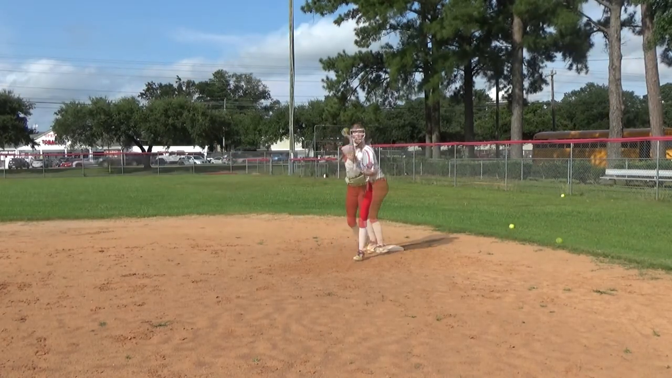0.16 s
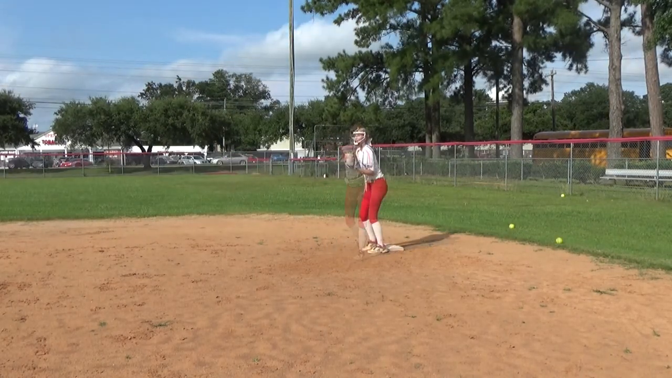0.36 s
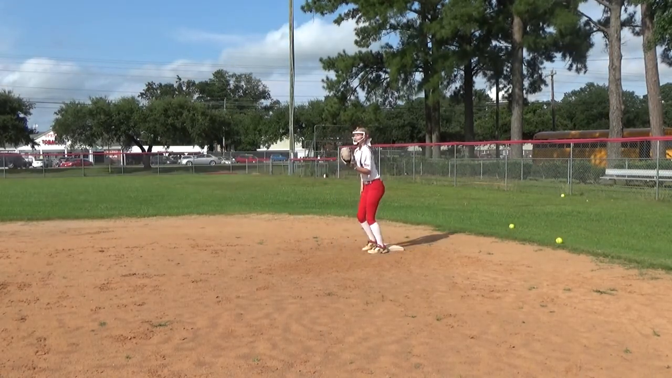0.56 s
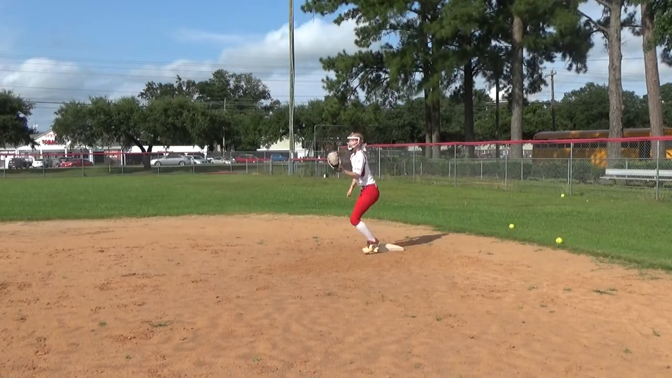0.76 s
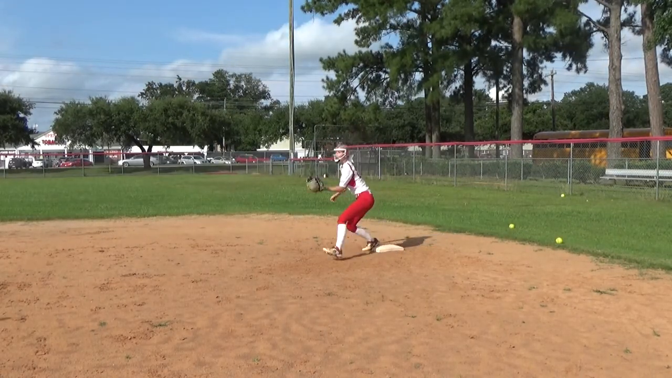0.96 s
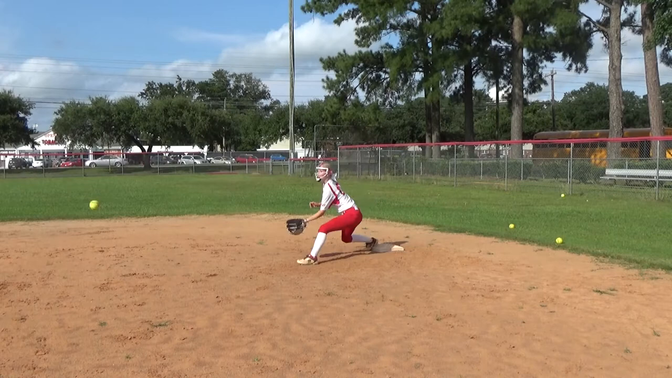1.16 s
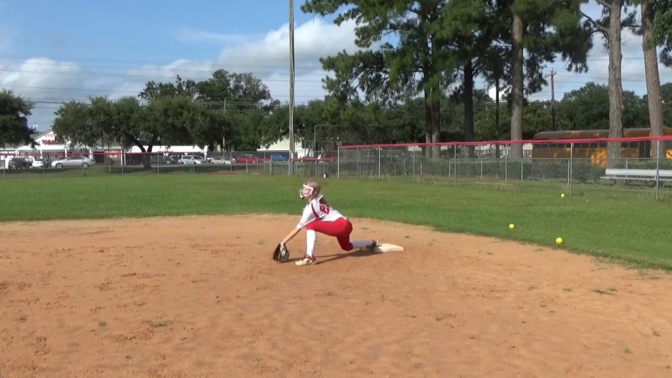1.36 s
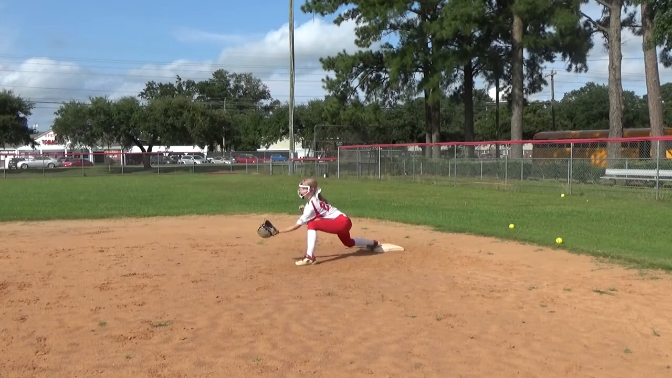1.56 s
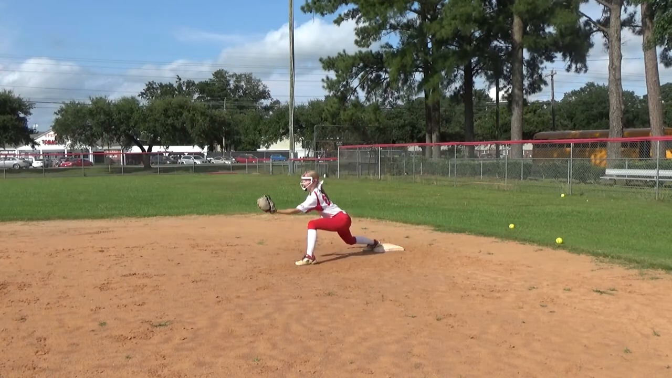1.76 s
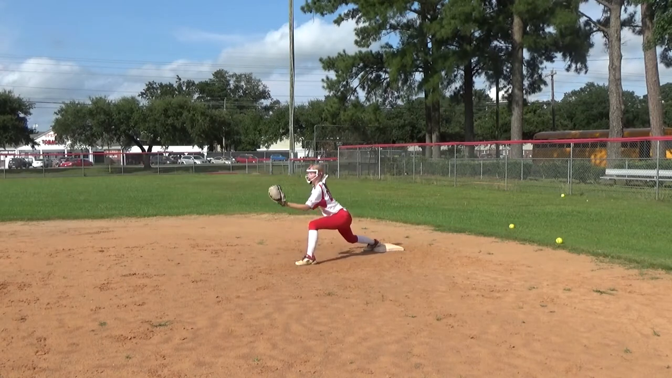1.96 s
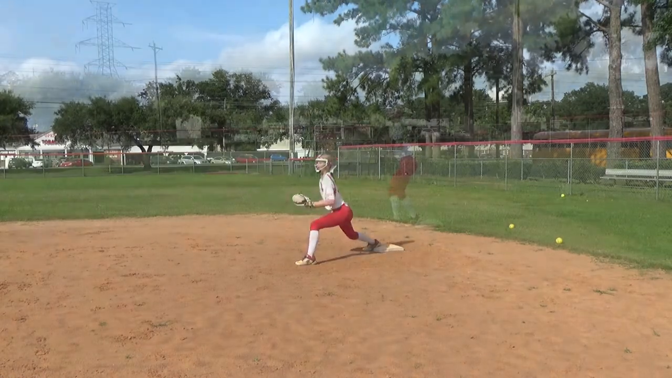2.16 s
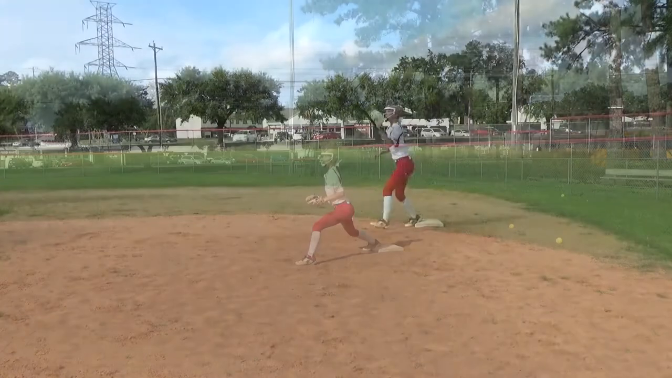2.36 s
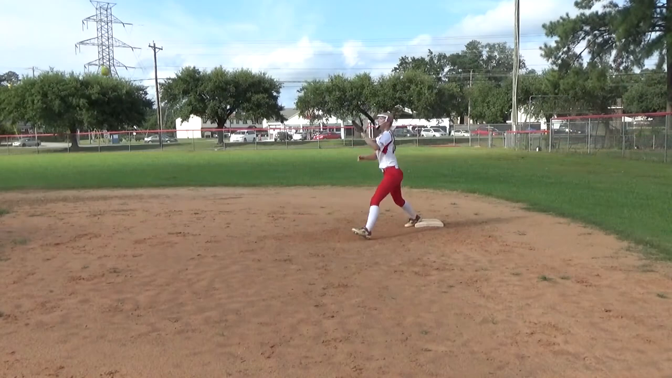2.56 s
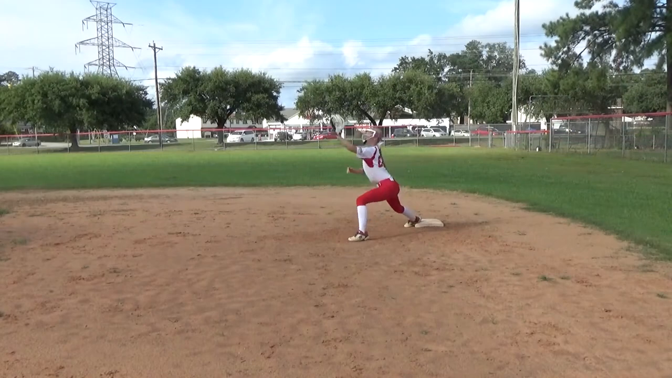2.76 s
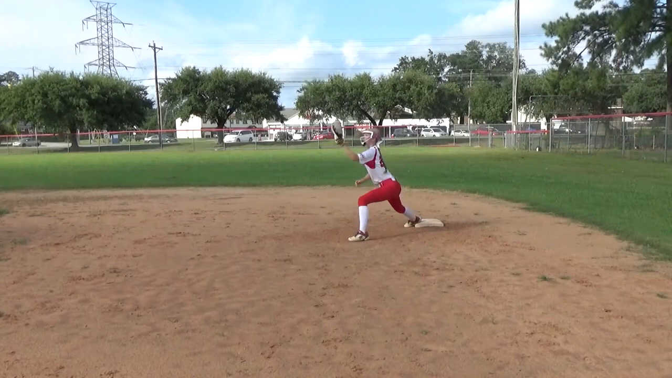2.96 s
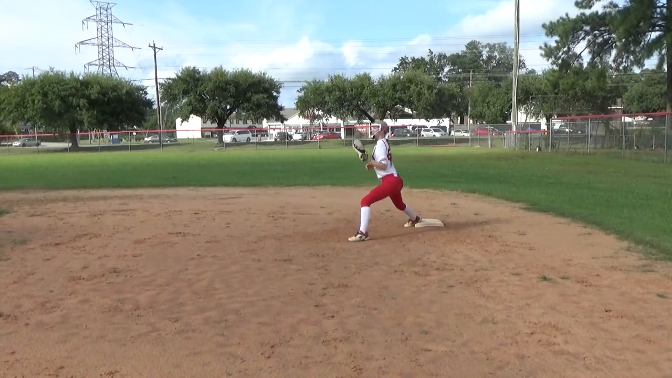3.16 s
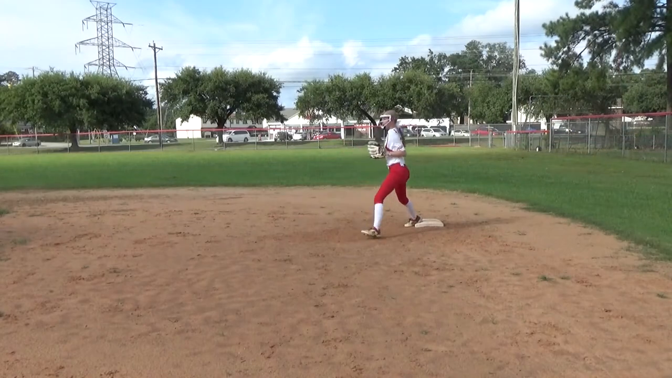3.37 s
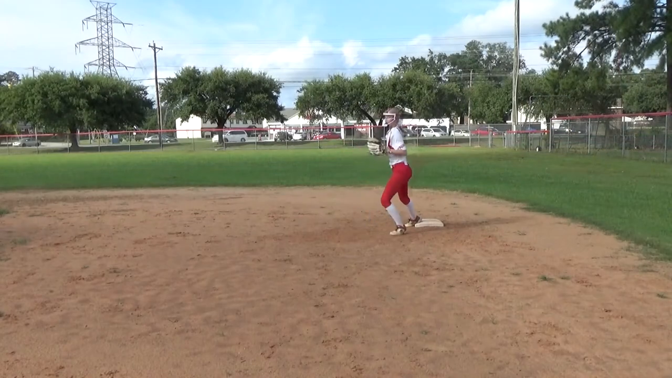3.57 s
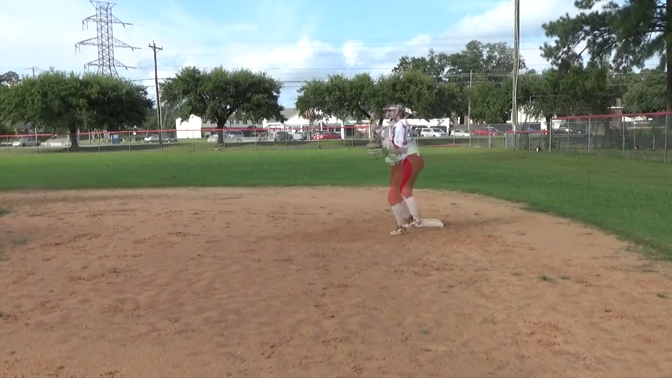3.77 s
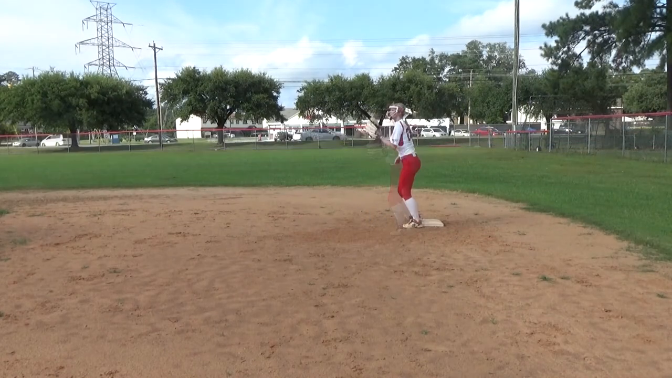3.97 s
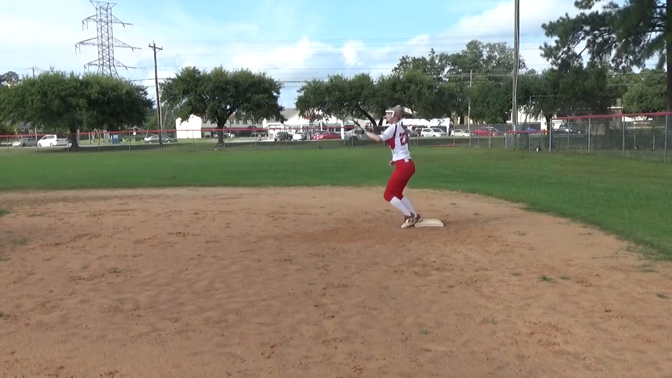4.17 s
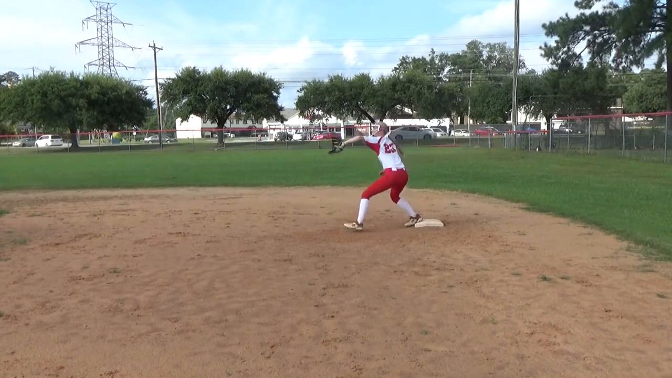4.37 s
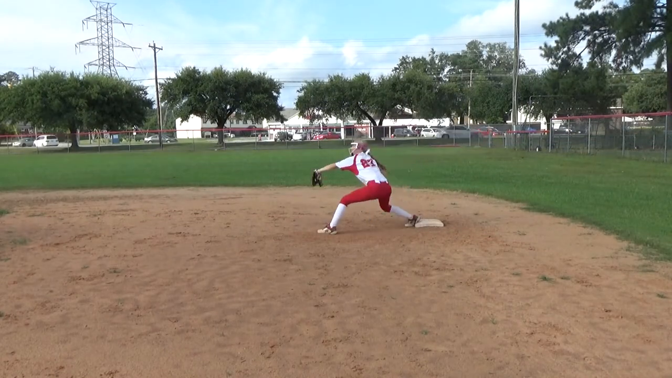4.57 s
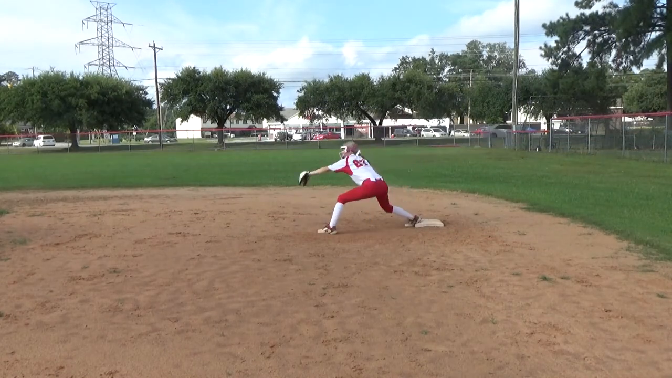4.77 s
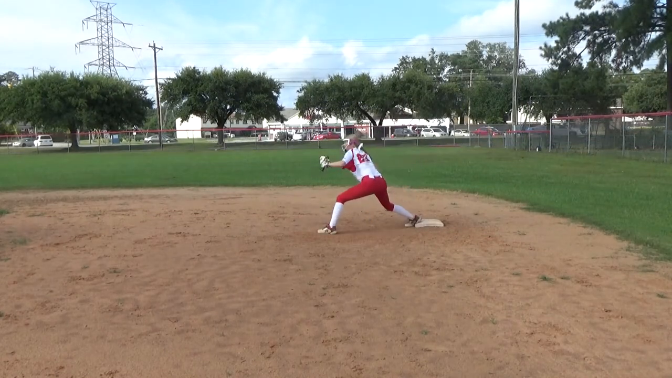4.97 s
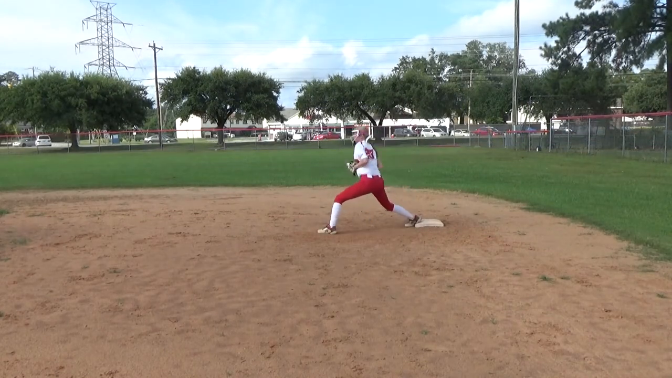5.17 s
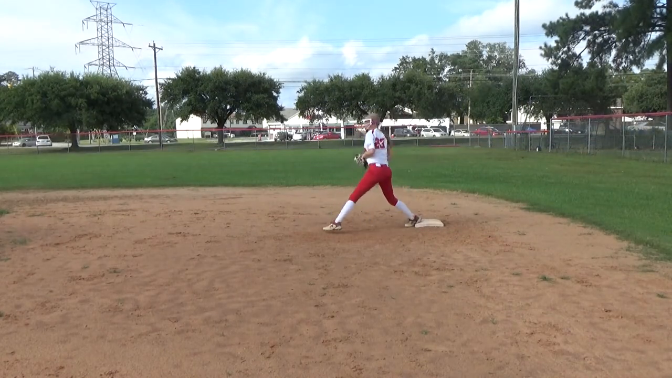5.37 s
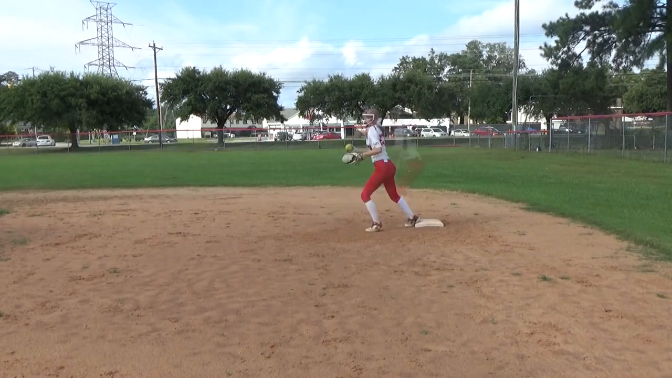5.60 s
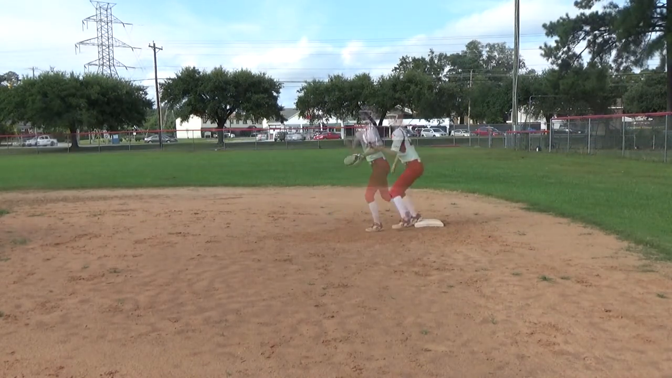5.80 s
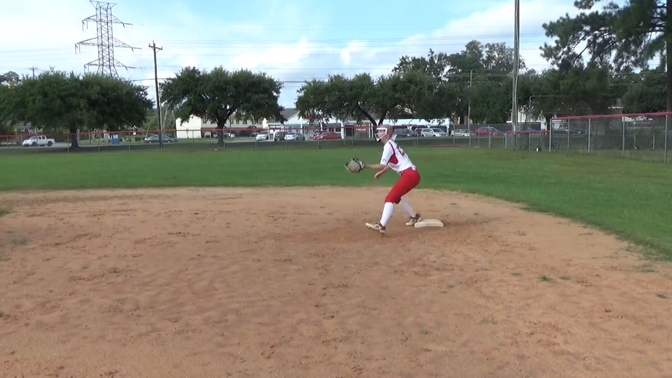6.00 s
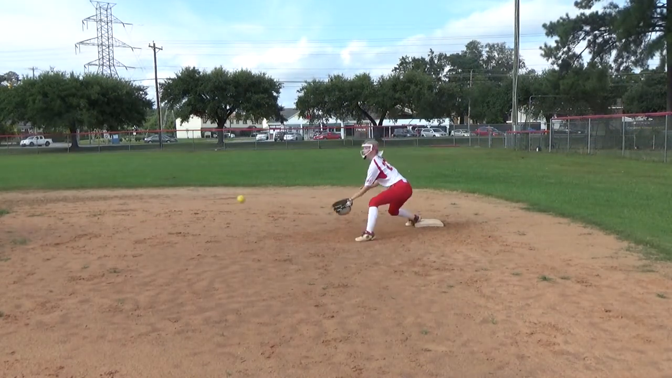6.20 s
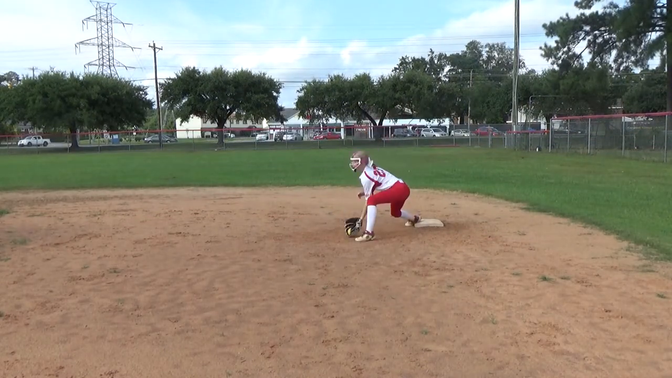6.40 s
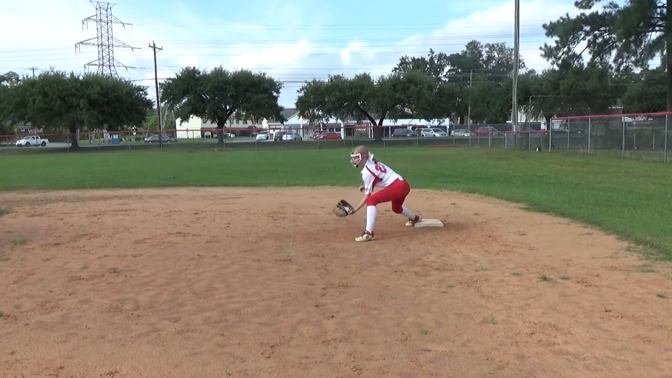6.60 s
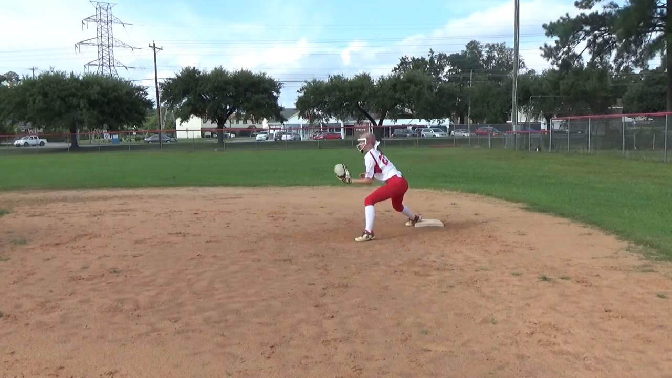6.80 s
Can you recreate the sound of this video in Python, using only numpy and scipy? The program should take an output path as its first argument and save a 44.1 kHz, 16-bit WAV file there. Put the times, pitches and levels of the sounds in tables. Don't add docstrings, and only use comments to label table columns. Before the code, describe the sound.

A fielder catches four throws on a dirt infield. Each catch is a hard, dry leather pop with a very short pocket ring, surrounded by gritty steps, cloth rustle and tiny knocks. The last three slap back faintly from the right. Gusts rumble and flutter on the camera's microphone, strongest early, above distant traffic and leaves; thin insects grow fuller near the end, with a barely audible mechanical tick.

```python
import sys
import numpy as np
from scipy import signal
from scipy.fft import rfft, irfft, next_fast_len
from scipy.io import wavfile
from scipy.ndimage import uniform_filter1d

SR = 44100
rng = np.random.default_rng(int(sys.argv[2]) if len(sys.argv) > 2 else 0)


def volts(x):
    e = np.asarray(x, float) / 20
    return 10 ** e


def output_pcm(signal):
    pcm = np.clip(np.atleast_2d(signal).T, -1, 1) * 32767
    wavfile.write(sys.argv[1], SR, np.round(pcm).astype(np.int16))


N = 301718
SIDES = np.array([[1], [-1]])

# start in seconds, end in seconds, level left in dB.
DROPOUTS = [
    (.2912, .2932, -12),
    (2.3602, 2.3722, -30),
    (3.8622, 3.8862, -95),
]
# start in seconds, slap in dB, pocket ring in dB, pocket ring in Hz, ring T60 in ms.
CATCH_BLOWS = [(1.4461, -8, -15, 1600, 45), (1.4481, -38, -7.5, 5860, 10), (1.448, -10, -10, 1017, 26),
               (1.4524, -18, -9, 797, 24), (2.8379, -8.5, -5.5, 6630, 9), (2.8395, -23, -4, 760, 8.9),
               (2.8433, -9.5, -9, 1140, 11), (2.8469, -9.5, -6, 813, 29), (2.8594, -15.5, -17, 910, 28),
               (4.622, -37, -18, 1320, 23), (4.6379, -14.5, 1, 1170, 7.5), (4.643, -34, -20, 1090, 27),
               (4.6614, -30, -17, 970, 15), (6.4097, -9.5, -6.5, 740, 8.3),
               (6.4107, -15.5, -10.5, 1650, 7.3), (6.4146, -28, -10, 705, 5.8), (6.434, -40, -35, 990, 23)]
# catch start in seconds, delay in ms, level in dB.
FENCE_ECHOES = [
    (2.837, 58, -14),
    (4.636, 54, -6),
    (6.407, 56.5, -11.5),
]


def evened(x):
    return x / np.sqrt(np.mean(x ** 2) + 1e-20)


def read(points, hz):
    f, value = np.transpose(points)
    return np.interp(np.log(hz + 1), np.log(f + 1), value)


def coloured(x, points, same=None):
    size = next_fast_len(x.shape[-1])
    hz, z = np.fft.rfftfreq(size, 1 / SR), rfft(x, size)
    if same:
        c = np.clip(read(same, hz), 0, 1)
        z = np.array([z[0], c * z[0] + np.sqrt(1 - c ** 2) * z[1]])
    return evened(irfft(z * volts(read(points, hz)), size)[..., :x.shape[-1]])


def lumps(per_s, channels=1):
    coarse = rng.standard_normal((channels, N // 32 + 2))
    hz = np.fft.rfftfreq(coarse.shape[1], 32 / SR)
    smooth = irfft(rfft(coarse) * np.exp(-(hz / per_s) ** 2), coarse.shape[1])
    return evened(np.repeat(smooth, 32, axis=1)[:, :N])


def band(x, hz, width):
    b, a = signal.iirpeak(hz, hz / width, SR)
    return signal.lfilter(b, a, signal.lfilter(b, a, x))


def stroke(start, length, rise, fall):
    t = np.arange(round(length * SR)) / SR
    at = round(start * SR) + np.arange(len(t))
    gain = np.clip(np.minimum(t / rise, (length - t) / fall), 0, 1)
    return at[at < N], gain[at < N]


def field():
    # time in seconds, level in dB.
    scene_db = [(0.0, -47.5), (1.41, -43.5), (2.5, -49), (2.8, -47.5), (3.14, -49.5), (4.86, -48.5),
                (5.01, -49.5), (6.1, -52.5), (6.29, -51.5), (6.42, -49), (6.65, -48.5), (6.84, -51)]
    # frequency in Hz, density in dB per Hz.
    wash_spectrum = [(25, -26), (60, -5.5), (120, 1.5), (220, -2), (420, -3.5), (800, 3.5), (1500, 1.5),
                     (2500, -3.5), (4000, -9), (6300, -12.5), (8500, -17), (10300, -17.5), (13000, -26.5),
                     (16000, -30.5)]
    # frequency in Hz, left-right likeness from 0 to 1.
    wash_likeness = [(60, 0.91), (150, 0.95), (380, 1), (950, 0.88), (2380, 0.64), (5980, 0.66),
                     (11000, 0.89)]
    return_db, return_s = 3, 0.074
    wash = coloured(rng.standard_normal((2, N)), wash_spectrum, wash_likeness)
    t = np.arange(N) / SR
    catch_starts = [CATCH_BLOWS[0][0]] + [row[0] for row in FENCE_ECHOES]
    tree_return = sum((t > s) * np.exp(-abs(t - s) / return_s) for s in catch_starts)
    level_db = np.interp(t, *np.transpose(scene_db)) + 5.0
    return volts(level_db + return_db * tree_return + 0.53 * lumps(7.5)) * wash


def wind():
    # start in seconds, length in seconds, rumble in dB, sharpness in dB.
    gusts = [(0.264, .21, -36.5, 7), (0.457, 0.19, -37, 2), (0.627, 0.18, -33.5, 6.5),
             (0.782, 0.24, -36, 7.5), (1.02, 0.15, -36, -5), (1.113, 0.25, -35.5, -2),
             (1.382, 0.1, -35, -3), (1.465, 0.37, -49.5, -9), (1.827, 0.17, -37, 0),
             (2.015, 0.072, -30.5, -2.5), (2.094, 0.39, -40, -17), (2.373, 0.08, -38, 4.5),
             (2.453, 0.21, -34.5, 8), (2.654, 0.19, -33, 2.5), (2.925, 0.23, -38.5, 2), (3.2, 0.27, -38, 1),
             (3.394, 0.22, -38.5, -2.5), (3.593, 0.31, -39, -3), (3.774, 0.2, -42.5, 7),
             (4.507, 0.204, -46.5, -15), (4.968, 0.13, -47.5, -25), (5.212, 0.35, -46.5, -16),
             (5.539, 0.19, -36, -9), (5.662, 0.17, -41, 0), (5.89, 0.17, -48, -1.5),
             (6.067, 0.11, -48.5, 4), (6.15, 0.17, -38.5, -1.5), (6.29, 0.15, -40.5, -7),
             (6.45, 0.12, -45, 2), (6.53, 0.12, -37.5, 3), (6.63, 0.21, -39.5, -3.5)]
    # frequency in Hz, density in dB per Hz.
    eddy_spectra = [
        [(25, -44), (60, -14.5), (120, -5), (200, 2), (290, -5), (600, -15.5), (2000, -88)],
        [(60, -31), (170, -17.5), (280, -1), (420, -3), (620, -12), (1500, -35), (4000, -64)],
        [(200, -30), (420, -11), (600, 5.5), (900, -2), (1500, -14), (3000, -39), (8000, -80)],
    ]
    # depth in dB, rate per second.
    eddy_lumps = [
        (2.4, 16),
        (3., 35),
        (3.8, 74),
    ]
    # frequency in Hz, left-right likeness from 0 to 1.
    port_likeness = [(60, .93), (150, .97), (300, .985), (500, .96), (800, .85), (1300, .6)]
    swell_s, die_s, breeze_db = 0.085, 0.14, -66.5
    roar_db, roar_share = -4, 1.16
    lag_ms, lag_swing_ms = .47, .08

    shared_db = 0.45 * lumps(39)
    force = np.full((3, N), volts(breeze_db))
    for start, length, db, sharp_db in gusts:
        at, gain = stroke(start - swell_s / 2, length + (swell_s + die_s) / 2, swell_s, die_s)
        size_db = np.array([[0], [sharp_db], [roar_db + roar_share * sharp_db]])
        force[:, at] += gain ** 2 * volts(db + size_db)
    force[:, :round(DROPOUTS[0][0] * SR)] = volts(breeze_db)
    calm_start = round(DROPOUTS[2][0] * SR)
    calm_end = round(DROPOUTS[2][1] * SR + 2 * die_s * SR)
    force[:, calm_start:calm_end] = volts(breeze_db)

    out = 0
    for spectrum, (lump_db, per_s), gain in zip(eddy_spectra, eddy_lumps, force):
        eddies = rng.standard_normal((2, N)) * volts(lump_db * lumps(per_s) + shared_db)
        out = out + gain * coloured(eddies, spectrum, port_likeness)
    drift = uniform_filter1d(lumps(8.0)[0], size=64)
    t = np.arange(N) / SR
    half_lag_s = (lag_ms + lag_swing_ms * drift) / 2000
    ports = np.array([np.interp(t + half_lag_s, t, out[0]), np.interp(t - half_lag_s, t, out[1])])
    return volts(SIDES * 0.36 * lumps(5.3)) * ports


def insects():
    # frequency in Hz, width in Hz, level in dB, clicks per second.
    choruses = [
        (7163, 430, -55.5, 2100),
        (9900, 950, -51.5, 11000),
        (5000, 1100, -60.5, 2900),
        (9100, 87, -65, 710),
        (4080, 340, -68, 850),
        (13500, 1800, -71, 6000),
    ]
    # start in seconds, end in seconds.
    song_times = [
        (0, 7),
        (5.829, 7),
        (5.829, 7),
        (.38, .8),
        (3.89, 5.829),
        (5.6, 7),
    ]
    t, out = np.arange(N) / SR, np.zeros((2, N))
    for (start, end), (hz, width_hz, db, per_s) in zip(song_times, choruses):
        clicks = rng.standard_normal((2, N)) * (rng.random((2, N)) < per_s / SR)
        clicks = clicks[0] + 0.34 * clicks[1] * SIDES
        singing = (t > start) & (t < end)
        out += volts(db + 1.4 * lumps(14)) * evened(band(clicks, hz, width_hz)) * singing
    return out


def camera():
    frame_rate_hz, first_tick_s = 29.97, .0235
    tick_s = first_tick_s + np.arange(int(N / SR * frame_rate_hz)) / frame_rate_hz
    at = (tick_s * SR).astype(int)
    ticks = np.zeros(N)
    ticks[at] = volts(2.2 * rng.standard_normal(len(at)))
    return volts(-61) * evened(band(ticks, 2740, 170))


def scuffs():
    # start in seconds, length in seconds, grit in dB, scrape over grit in dB, dust
    # over grit in dB.
    scuff_strokes = [(1.246, 0.046, -47, 17, 3.5), (1.294, 0.056, -45, 9, -2.5), (1.454, .02, -37, 0, 6),
                     (2.215, .045, -53, 3, 0), (2.702, 0.036, -37, 6, -2), (2.732, 0.04, -37.5, 2.5, -1),
                     (2.778, 0.037, -45, -12, -3), (2.883, 0.028, -44, 1, 3), (3.362, 0.048, -57, -5, 2),
                     (3.422, 0.062, -41, -2.5, -5.5), (3.473, 0.04, -38.5, 6, -1),
                     (3.645, 0.053, -45, 5, -7), (3.716, 0.022, -50.5, 12, 1), (3.912, 0.05, -60, -6, 11),
                     (4.581, 0.031, -46, 8, -5), (4.608, 0.075, -51, 10, 1), (4.677, 0.038, -46, 11, 1),
                     (6.223, 0.042, -46, 7.5, -1), (6.256, 0.043, -39, 6, -2.5), (6.316, 0.05, -40.5, 5, -5),
                     (6.447, 0.029, -45.5, 5, 3),
                     (1.472, 0.026, -45, 0, 5),
        (1.496, 0.075, -44.5, -14, 0.5),
        (4.715, 0.074, -46, 1, -3.5),
        (4.78, 0.103, -48, 2.5, -15),
        (5.69, 0.052, -52, 11, -2.5),
        (5.751, 0.045, -55, 12, -9),
        (6.472, .14, -50.5, 4, -2),
    ]
    # frequency in Hz, density in dB per Hz.
    grit_spectrum = [(900, -18), (2000, -10.5), (3300, -3.5), (6000, -4.5), (8000, -11.5), (11000, -50)]
    dust_spectrum = [(4500, -52), (7000, -5), (8500, 2), (10600, 5), (13500, -7), (16000, -19)]
    scrape_spectrum = [(350, -7.5), (800, 3), (1400, 5), (2200, 3.5), (3500, -18), (6000, -70)]
    bite_s, lift_s, drag_db_per_s = 0.0069, 0.013, -42

    grain_db = 5.0 * np.minimum(rng.exponential(1, N), 4) + 1.7 * lumps(190)
    grains = rng.standard_normal((2, N)) * volts(grain_db)
    grains = grains[0] + 0.088 * grains[1] * SIDES
    grit = coloured(grains, grit_spectrum)
    dust = coloured(grains, dust_spectrum)
    scrape = coloured(grains * volts(2.2 * lumps(70)), scrape_spectrum)
    force = np.zeros((3, N))
    for start, length, grit_db, scrape_db, dust_db in scuff_strokes:
        at, gain = stroke(start, length, bite_s, lift_s)
        layer_db = np.array([[1.5], [-0.5 + dust_db], [scrape_db]])
        force[:, at] += gain * volts(grit_db + drag_db_per_s * (at / SR - start) + layer_db)
    return force[0] * grit + force[1] * dust + force[2] * scrape


def fence(blows):
    catch_s = 0.03
    out = blows.copy()
    dull = signal.lfilter(*signal.butter(1, 3500, fs=SR), blows[0])
    for s, delay_ms, db in FENCE_ECHOES:
        at, gain = stroke(s, catch_s, .001, 0.0044)
        out[:, at + round(delay_ms * SR / 1000)] += volts(db) * gain * dull[at]
    return out


def glove():
    # frequency in Hz, density in dB per Hz.
    leather_spectrum = [(500, 11), (1200, 3.5), (1900, -1.5), (2650, 0.5), (3400, -3.5), (4400, -2),
                        (5200, -3.5), (5900, -4), (6800, -10.5), (8300, -9), (9700, -5.5), (11000, -10.5),
                        (13000, -19), (16000, -30)]
    # start in seconds, slap in dB, ring in dB, ring in Hz.
    small_knocks = [(1.2653, -28, -11, 1190), (1.2702, -32, -13, 1750), (1.2768, -38, -18, 1670),
                    (1.3851, -23, -21, 1870), (1.4697, -16, -25, 1400), (1.504, -43, -21.5, 880),
                    (1.661, -40, -20, 6000), (1.6412, -33, -14.5, 1440), (2.67, -36, -15, 450),
                    (2.7197, -27, -16, 860), (2.742, -24, -19, 1410), (3.47, -16, -12, 2700),
                    (3.663, -22, -28, 716), (3.7195, -32, -23, 866), (4.6847, -29, -32, 1740),
                    (4.711, -31, -21, 1150), (4.7523, -37, -19.5, 1130), (4.7948, -37, -18.5, 960),
                    (4.862, -32, -45, 4000), (5.7157, -32, -28, 638), (5.7642, -33, -23, 825),
                    (5.775, -44, -16.5, 1650), (6.2395, -40, -10, 1280), (6.4657, -24, -16, 2230),
                    (6.467, -46, -16, 262), (6.476, -37, -30, 2000)]
    catch_slap_ms, slap_growth, knock_slap_ms = 2.1, .25, 1.
    knock_cycles, knock_t60_ms = 15, 17

    tail = 4096
    t, out = np.arange(tail) / SR, np.zeros((2, N + tail))
    blows = [(*row, catch_slap_ms * volts(slap_growth * (row[1] + 23.5))) for row in CATCH_BLOWS]
    for row in small_knocks:
        blows.append((*row, min(knock_t60_ms, 1000 * knock_cycles / row[3]), knock_slap_ms))
    chance = rng.standard_normal((len(blows), 3, tail))
    for (s, slap_db, ring_db, hz, t60_ms, slap_ms), (a, b, c) in zip(blows, chance):
        slap_rise = np.minimum(t / 0.000068, 1)
        slap_shape = np.exp(-(t / (slap_ms / 1000 + 1e-4)) ** 1.43) + 0.09 * np.exp(-t / 0.0068)
        crackle = coloured(a + 0.074 * b * SIDES, leather_spectrum)
        slap = volts(slap_db - 4.0) * slap_rise * slap_shape * crackle

        wobble = 0.078 * np.cumsum(uniform_filter1d(c, 20)) / 20
        turns = hz * t * (1 - 11.2 * t) + wobble
        modes = -np.sin(2 * np.pi * turns) - 0.25 * np.sin(2 * np.pi * 1.9 * turns)
        ring_decay = volts(ring_db - 3.5 - 60000 * t / max(t60_ms, 3))
        ring = ring_decay * np.minimum(t / 0.00034, 1) * modes

        low_cut = signal.butter(3, .7 * min(hz, 850), "high", fs=SR)
        at = round(s * SR)
        out[:, at:at + tail] += signal.lfilter(*low_cut, slap + ring)
    return fence(out[:, :N])


def scene():
    # start in seconds, end in seconds.
    aside_times = [
        (2.888, 2.912),
        (4.672, 4.725),
        (6.452, 6.478),
    ]
    low_cut = signal.butter(2, 140, "high", fs=SR, output="sos")
    player = signal.sosfilt(low_cut, scuffs() + glove())
    t = np.arange(N) / SR
    aside = uniform_filter1d(sum((t > a) & (t < b) for a, b in aside_times) * 1., size=200)
    left = np.interp(t - .00003 * aside, t, player[0]) * volts(-.3 - 2.2 * aside)
    right = player[1] * volts(0.44 + 5.3 * aside)
    player = np.array([left, right])
    return field() * volts([[-.2], [.2]]) + wind() + insects() + player + camera()


def top_cut(x):
    return signal.sosfilt(signal.butter(12, 16680, fs=SR, output="sos"), x)


def record(dry):
    t, gain = np.arange(N) / SR, np.ones(N)
    for start, end, db in DROPOUTS:
        gain[(t > start) & (t < end)] = volts(db)
    low_pass = signal.firwin(401, 15800, window=("kaiser", 7), fs=SR)
    limited = signal.oaconvolve(dry, low_pass[None], "same")
    return top_cut(limited * uniform_filter1d(gain, size=12))


dry = scene()
out = record(dry)
output_pcm(out)
```